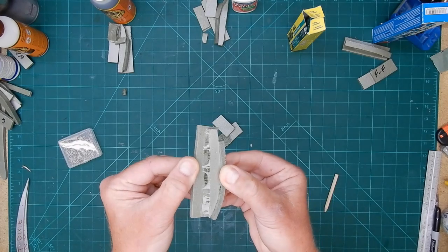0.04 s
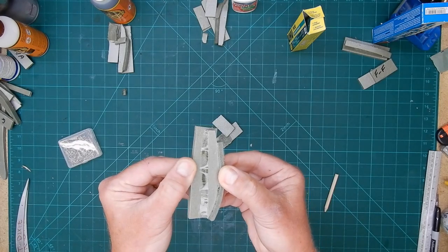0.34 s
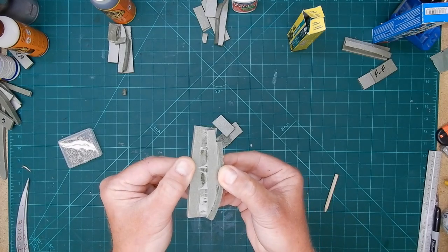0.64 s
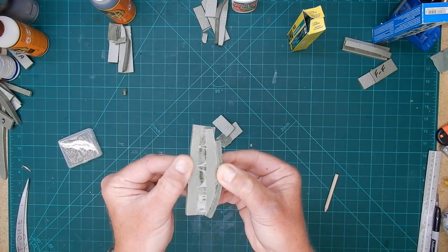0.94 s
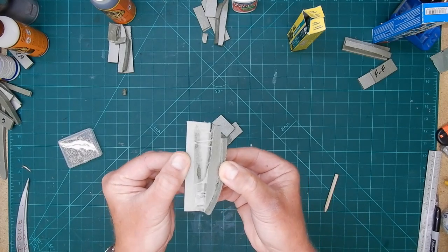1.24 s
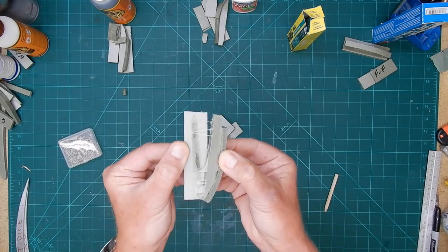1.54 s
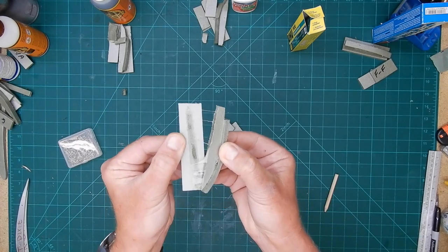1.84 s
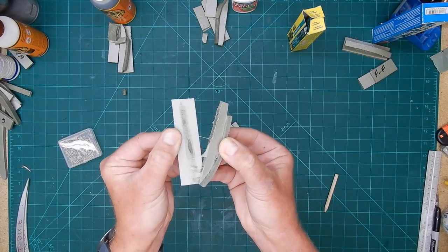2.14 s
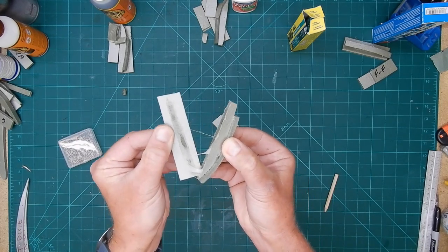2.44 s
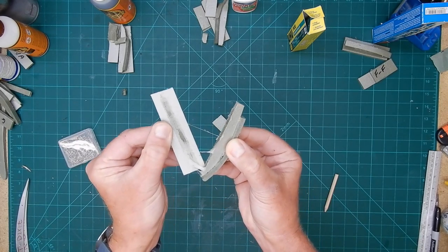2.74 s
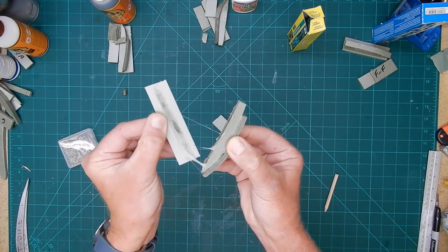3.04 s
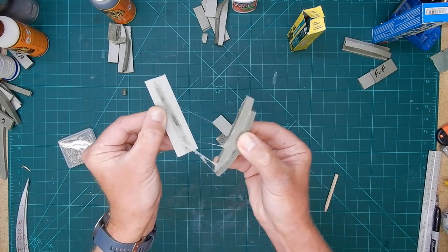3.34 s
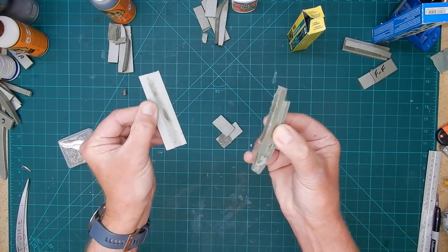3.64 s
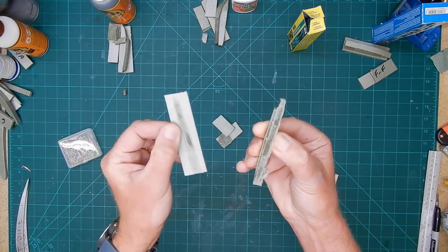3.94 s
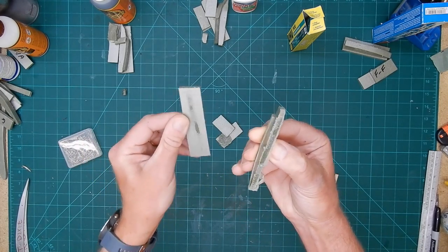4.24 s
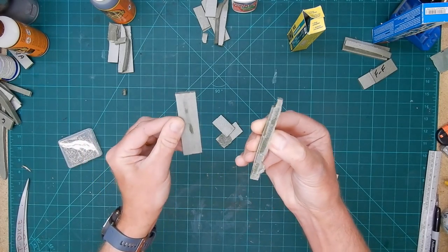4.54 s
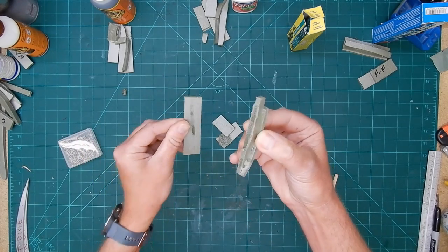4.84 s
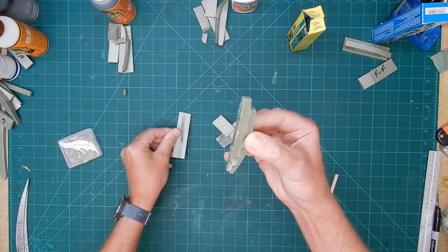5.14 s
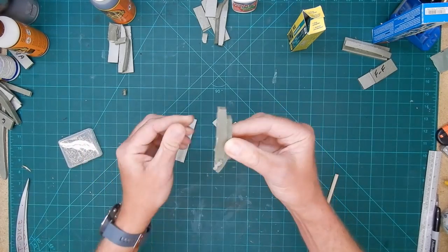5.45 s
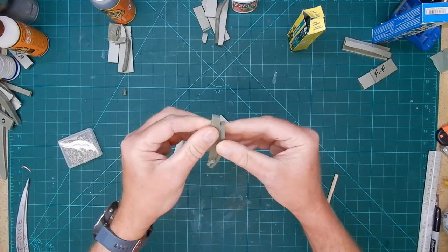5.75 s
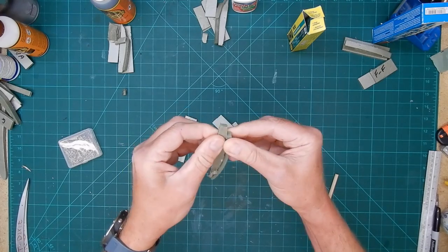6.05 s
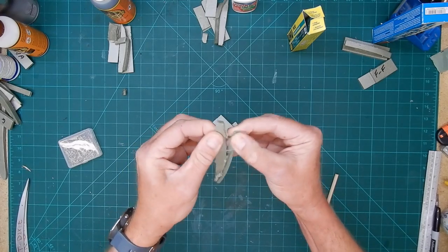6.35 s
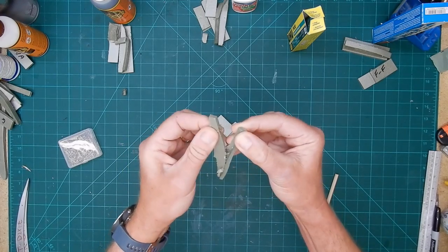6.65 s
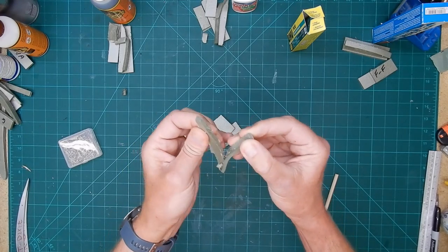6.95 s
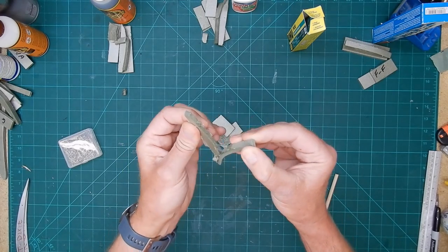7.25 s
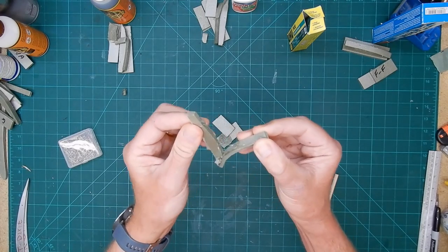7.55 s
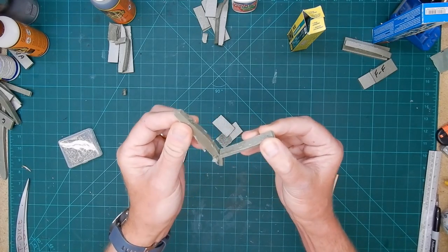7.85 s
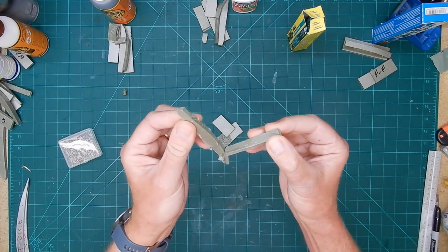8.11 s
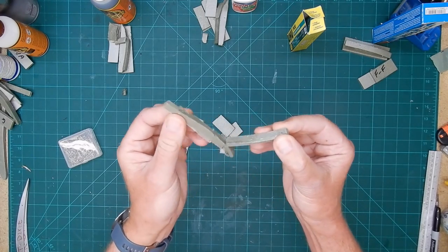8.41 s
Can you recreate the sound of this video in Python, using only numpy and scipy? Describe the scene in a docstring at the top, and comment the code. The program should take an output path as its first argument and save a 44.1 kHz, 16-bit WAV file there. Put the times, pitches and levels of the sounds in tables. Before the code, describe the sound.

Two glued foam strips are slowly pulled apart by hand, giving a fine, faint crackle dotted with sharper snaps. They come free with a couple of small hollow pops. Fingers rub softly on the foam and one strip taps down on a cutting mat, then the other is split with more crackling and snapping. The microphone is close overhead in a small, quiet workroom with low background noise.

```python
"""Two glued foam strips are pulled apart by hand above a cutting mat in a small, quiet workroom.
With each pull, glue threads and foam cells part in a fine crackle with sharper snaps; one strip is
laid down, the fingers shift their grip on the other and split it again. The mat throws a bright echo
up to the overhead microphone, and a soft room noise swells and dips behind it all."""
import sys
import numpy as np
from scipy import signal
from scipy.fft import rfft, irfft, next_fast_len
from scipy.io import wavfile
from scipy.ndimage import uniform_filter1d, map_coordinates

SR = 44100
rng = np.random.default_rng(int(sys.argv[2]) if len(sys.argv) > 2 else 0)


def put_to_file(sound):
    """Save the sound as 16-bit audio at rate SR, in the file named by the first command-line argument."""
    columns = np.atleast_2d(sound).T  # one column per channel
    safe = np.clip(columns, -1, 1)
    whole_steps = np.round(safe * 32767)
    wavfile.write(sys.argv[1], SR, whole_steps.astype(np.int16))


N = 382788

# The dull bed of room noise. Each row: frequency in Hz, level in dB.
ROOM_TONE_EQ = [(20, -2.5), (35, -26), (60, -3), (85, -14), (125, -4.5), (190, -1), (280, -4), (450, -4),
                (600, -10), (1100, -8.5), (1600, -15), (2600, -23.5), (4500, -31), (9000, -39.5),
                (15000, -39)]
# A faint electronic whine. Each row: pitch in Hz, level in dB relative to the room noise.
WHINE_TONES = [(11808, -29), (12407, -28), (12467, -32)]
# The bed ducks after sharp cracks. Each row: time of the low point in seconds, depth in dB.
ROOM_TONE_DIPS = [(.2, 16), (.9, 10.5), (1.19, 13.5), (1.57, 19), (1.8, 15), (2.63, 10.5), (3.16, 9),
                  (3.53, 8), (5.28, 5.5), (6.51, 13.5), (7.06, 8.5), (7.85, 18), (8.62, 10.5)]
# The room's tail. Each row: frequency in Hz, time to fade by 60 dB in seconds.
TAIL_T60 = [(150, 0.39), (1000, 0.02), (4000, 0.1767), (14000, 0.17)]
# The tail's colour. Each row: frequency in Hz, level in dB.
TAIL_EQ = [(150, -9.5), (1000, 10), (4000, -4.5), (14000, -2)]
# The dull straight path and the bright bounce off the mat. Each row: frequency in Hz, gain in dB.
DIRECT_EQ = [(200, -2.5), (3000, -0.5), (6000, -3), (9000, -8), (15000, -28.5)]
MAT_EQ = [(200, -6), (1500, -4.5), (4000, -5), (8000, 0), (15000, -1)]
# Knock of a flexing strip, crack of foam, fizz of parting glue. Each row: frequency in Hz, level in dB.
KNOCK_EQ = [(60, -37), (160, -11), (330, -4), (600, -4.5), (900, 1.5), (1300, -13), (2500, -35)]
CRACK_EQ = [(400, -34), (950, -12), (1300, 2.5), (2200, 3), (3700, 3.5), (5200, -0.5), (6800, -5),
            (10000, -44)]
FIZZ_EQ = [(2500, -35.5), (4800, -2.5), (6500, -2.5), (8500, 0.5), (11000, 0.5), (14000, 0.5), (16000, -2)]
# Resonances of a glue-stiffened strip and a loose one. Each row: centre in Hz, width in octaves,
# boost or cut in dB.
STUCK_RESONANCES = [(1310, 0.057, -4), (2290, 0.12, 16), (3600, 0.096, 21), (4990, 0.24, -18.5)]
LOOSE_RESONANCES = [(1350, 0.12, 8.4), (2010, 0.2, 4.4), (4440, .12, 10)]
# How much of the strip is still glued. Each row: time in seconds, share from 0 to 1.
STUCK_SHARE = [(0, 0.46), (1.05, 0.37), (1.25, 0.8), (1.8, 0.55), (2.3, 0.04), (6.5, 0.8), (7, 0.52),
               (8.6, 0.34)]
# Fingers sliding to a new grip. Each row: start in seconds, length in seconds, level in dB.
FINGER_RUBS = [(2.98, 0.0057, -67), (3.9, .04, -60), (4.09, 0.0089, -74), (4.235, 0.0058, -67),
               (4.375, 0.038, -65.5), (4.55, 0.015, -74), (4.925, 0.018, -62), (5.33, 0.039, -65),
               (5.575, 0.0068, -73), (5.755, 0.056, -66.5), (5.876, 0.0035, -48.5), (6.0, .15, -70.5),
               (6.171, 0.003, -46.5), (6.33, 0.11, -66), (6.487, .015, -45.5)]
# A whole strip jerks and pushes the air. Each row: start in seconds, level in dB.
STRIP_JERKS = [(0.1841, -46.5), (1.1433, -54), (1.5654, -51), (5.247, -48.5), (5.256, -51.5), (7.7461, -61),
               (8.6087, -64)]
# Hollow pops and pings. Each row: start in seconds, pitch in Hz, level in dB, 60 dB fade in seconds.
STRIP_POPS = [(2.15, 1337, -43.5, 0.047), (2.152, 338, -52.5, 0.091), (2.149, 566, -50.5, 0.063),
              (3.4731, 360, -43.5, 0.061), (3.4739, 474, -38, 0.057), (3.58, 817, -40, 0.037),
              (3.579, 4510, -39, 0.034), (5.2524, 178, -42.5, 0.064)]
# Pulls that keep the seam tearing. Each row: start and length in seconds, crack and fizz levels in dB.
SEAM_PULLS = [(0, 0.33, -70.5, -66.5), (0.248, .5, -73, -70.5), (0.787, 0.37, -66.5, -64.5),
              (1.16, 0.03, -46.5, -47.5), (1.217, 0.024, -51.5, -54.5), (1.286, .17, -60.5, -63),
              (1.485, .07, -53.5, -56.5), (1.598, .15, -63.5, -66.5), (1.759, .03, -56, -59),
              (1.833, .28, -80.5, -81), (2.164, 0.052, -62, -64), (2.409, 0.059, -53, -55),
              (2.478, .15, -50.5, -53.5), (2.688, .045, -52, -52.5), (3.113, .16, -67, -65.5),
              (3.332, .13, -75.5, -71), (3.464, .025, -48, -55), (6.486, .07, -64, -59.5),
              (6.601, 0.13, -89, -76.5), (6.811, 0.25, -73, -67.5), (7.097, .025, -55.5, -52.5),
              (7.16, 0.083, -73.5, -73), (7.297, .16, -71.5, -67), (7.493, 0.087, -77, -70.5),
              (7.711, 0.15, -64.5, -60.5), (8.499, .14, -69, -65)]
# The featured snaps of glue and foam, and taps of the strips. Each row: start in seconds,
# knock, crack and fizz levels in dB, ring pitch in Hz.
CLEAR_SNAPS = [(0.037, -75, -73.5, -56, 7870), (0.1266, -66.5, -61, -55, 1200),
               (0.1597, -71, -54, -49, 5200), (0.1852, -48.5, -39.5, -37, 3360),
               (0.2058, -61, -41, -37.5, 3680), (0.2473, -86, -62, -46.5, 7510),
               (0.2757, -79, -50.5, -43.5, 2670), (0.463, -74, -50.5, -43, 5140),
               (0.489, -86, -57, -51, 4690), (0.5237, -82, -58, -46, 7620), (0.537, -64, -49, -42.5, 2850),
               (0.6177, -92, -59, -55, 7900), (0.705, -76, -58, -82, 3300),
               (0.795, -82, -53.5, -45.5, 7900), (0.8555, -61, -46.5, -55, 3420),
               (0.8968, -55.5, -44.5, -36.5, 7550), (0.9685, -79, -58.5, -82, 4870),
               (0.9992, -64, -54.5, -70, 3580), (1.074, -82, -58.5, -53.5, 4960),
               (1.114, -60, -49, -47, 3470), (1.143, -50.5, -39.5, -42, 6140),
               (1.1818, -66, -48.5, -44.5, 3350), (1.191, -73, -57, -45, 3380),
               (1.2879, -70, -54, -54, 7940), (1.364, -80, -50, -51, 3300), (1.378, -68, -53, -53, 2350),
               (1.4146, -67, -47.5, -48.5, 3440), (1.4734, -69, -45.5, -47, 3580),
               (1.498, -73, -56, -48.5, 3570), (1.513, -75, -63, -54, 3560),
               (1.5413, -63, -50, -46.5, 3550), (1.5657, -54.5, -31, -36, 3870),
               (1.841, -80, -62, -63, 2290), (1.938, -74, -60, -62, 2310), (1.977, -81, -62, -62.5, 2200),
               (2.102, -80, -62, -67, 3500), (2.15, -48, -39.5, -44, 1370), (2.164, -56, -45.5, -44, 3340),
               (2.3313, -80, -54.5, -60, 3380), (2.3684, -80, -52, -59.5, 3600),
               (2.396, -63, -53, -54, 3600), (2.4071, -61, -44.5, -44, 2400),
               (2.4525, -61.5, -39, -40, 2100), (2.5132, -61, -45, -44, 1400),
               (2.5258, -56, -47.5, -51, 1270), (2.5445, -62, -45, -44, 2450),
               (2.5655, -64, -53, -45.5, 2340), (2.5927, -68, -40.5, -51, 2300),
               (2.5998, -60, -45.5, -40.5, 2250), (2.6137, -61, -41.5, -43, 2190),
               (2.651, -78, -45, -47, 4530), (2.688, -75, -46, -47, 4130), (2.709, -76, -44, -45, 4370),
               (2.7706, -78, -50.5, -54, 7240), (2.834, -79.5, -50.5, -53.5, 1800),
               (3.1482, -55.5, -35.5, -39.5, 2120), (3.1988, -80, -52, -51.5, 1467),
               (3.2244, -78, -51, -52, 1470), (3.3687, -77, -53, -54.5, 2110),
               (3.4732, -42.5, -32.5, -39, 2010), (3.4853, -53, -38.5, -46.5, 2030),
               (3.528, -54, -37.5, -37, 4600), (3.579, -45.5, -36.5, -40, 4500),
               (3.773, -59, -56, -66.5, 2140), (4.372, -67, -54, -59, 1200),
               (4.9719, -80, -55.5, -51.5, 1320), (5.254, -44.5, -36.5, -46, 2470),
               (5.2655, -47, -27, -40, 4000), (5.8764, -56, -49.5, -51, 5000),
               (6.4858, -55, -60, -39, 7660), (6.4949, -61, -59, -38.5, 7100),
               (6.78, -79, -65, -57.5, 6740), (6.956, -89, -55, -59, 3530), (7.0, -81, -57, -48.5, 7800),
               (7.0198, -71, -51, -51, 3580), (7.048, -58.5, -38.5, -42, 3430),
               (7.086, -75, -50, -47.5, 3300), (7.1007, -69, -47.5, -47.5, 2570),
               (7.331, -74, -63, -53.5, 7840), (7.3572, -77, -61, -60, 3310),
               (7.4071, -72, -62, -48.5, 7840), (7.4512, -74, -58, -69, 3350),
               (7.7447, -57, -41, -40, 4940), (7.8082, -59, -41.5, -41, 5970),
               (7.831, -52.5, -40, -40, 3150), (7.909, -77, -59, -60.5, 3260),
               (8.4347, -73, -65, -57, 3310), (8.5012, -76, -59, -55.5, 4900),
               (8.5248, -66, -54, -52, 3400), (8.562, -61, -49.5, -49, 4630),
               (8.6087, -50.5, -39, -39.5, 5200)]

MAT_DELAY_S = .003765


def amp(db):
    """Decibels to gain."""
    return 10 ** (np.asarray(db) / 20)


def unit(x):
    """Scaled to rms 1."""
    return x / np.sqrt(np.mean(x ** 2) + 1e-20)


def along(points, hz):
    """(Hz, value) points read on a log frequency axis."""
    freqs, values = np.transpose(points)
    return np.interp(np.log(hz + 1), np.log(freqs), values)


def filtered(x, response):
    """x through a complex frequency response."""
    size = next_fast_len(N + SR // 2)
    return irfft(rfft(x, size) * response(np.fft.rfftfreq(size, 1 / SR)), size)[:N]


def coloured(x, eq, resonances=(), size=1024):
    """x rung through a minimum-phase impulse of energy 1 with the given EQ and resonances."""
    hz, n = np.fft.rfftfreq(size, 1 / SR), np.arange(size)
    peaks_db = sum(db / (1 + (np.log2((hz + 1) / centre) / width) ** 2)
                   for centre, width, db in resonances)
    cepstrum = irfft(np.log(amp(along(eq, hz) + peaks_db)))
    impulse = irfft(np.exp(rfft(2 * cepstrum * (n < size // 2) * (n > 0))))
    return signal.fftconvolve(x, impulse / np.linalg.norm(impulse))[:len(x)]


def add(track, start, sound):
    """Mix a sound into the track at a start time in seconds."""
    part = track[max(0, round(start * SR)):][:len(sound)]
    part += sound[:len(part)]


def swells(rows, rise_db_per_s, fall_db_per_s, rest_db=-105):
    """Envelope in dB: each (start, length, dB) row fades in, holds and fades out; the highest wins."""
    t = np.arange(0, N, 32) / SR
    start, length, db = np.transpose(rows)[:, :, None]
    before, after = np.maximum(start - t, 0), np.maximum(t - start - length, 0)
    level = db - rise_db_per_s * before - fall_db_per_s * after
    return np.interp(np.arange(N) / SR, t, np.maximum(level.max(axis=0), rest_db))


def room_tone(level_db=-58):
    """Dull room noise, coloured by the mat, with a thin whine; both duck quickly and creep back."""
    dips = [(s, 0, depth) for s, depth in ROOM_TONE_DIPS]
    duck_db = swells(dips, rise_db_per_s=315, fall_db_per_s=15, rest_db=0)
    air = filtered(rng.standard_normal(N), lambda hz: amp(along(ROOM_TONE_EQ, hz)))
    t = np.arange(N) / SR
    whine = sum(amp(db) * np.sqrt(2) * np.sin(2 * np.pi * hz * t) for hz, db in WHINE_TONES)
    return amp(level_db - duck_db) * (unit(over_mat(air)) + whine)


def room_reverb(x, tail_db=-9, clutter_db=-7, clutter_t60=0.0456, spans=28):
    """Bench clutter scatters the sound and the walls add a short tail; both change as the hands move."""
    out, t = np.zeros(N), np.arange(SR // 4) / SR
    for span in np.array_split(np.arange(N), spans):
        hz, age, noise = signal.stft(rng.standard_normal(len(t)), SR, nperseg=256)
        decay = amp(along(TAIL_EQ, hz)[:, None] - 60 * age / along(TAIL_T60, hz)[:, None])
        tail = signal.istft(noise * decay, SR)[1][:len(t)]
        clutter = rng.standard_normal(len(t)) * amp(-60 * t / clutter_t60)
        impulse = (amp(tail_db) * unit(tail) + amp(clutter_db) * unit(clutter)) / np.sqrt(len(t))
        add(out, span[0] / SR + MAT_DELAY_S, signal.fftconvolve(x[span], impulse))
    return out


def over_mat(x):
    """Treble misses the microphone on the straight path and reaches it in the echo off the mat."""
    def response(hz):
        echo = amp(along(MAT_EQ, hz)) * np.exp(-2j * np.pi * hz * MAT_DELAY_S)
        return amp(along(DIRECT_EQ, hz)) + echo
    return filtered(x, response)


def finger_rubs(grain_db=4, catches_per_s=90, catch_db=3.0, foam_db=-8, gain_db=1):
    """Skin slides over the foam with a soft, grainy hiss, catching and slipping as it goes."""
    grip = rng.standard_normal(int(N * catches_per_s / SR) + 4)
    catch = map_coordinates(grip, [np.arange(N) * catches_per_s / SR])
    drive = amp(swells(FINGER_RUBS, rise_db_per_s=900, fall_db_per_s=600) + catch_db * catch + gain_db)
    slips = lambda: drive * unit(rng.standard_normal(N) * amp(grain_db * rng.standard_normal(N)))
    return coloured(slips(), FIZZ_EQ) + amp(foam_db) * coloured(slips(), CRACK_EQ)


def air_thumps(push_s=0.00093, gain_db=-6, size=1400):
    """One low push of air as a strip comes free or lands."""
    out, age = np.zeros(N), np.arange(size) / SR / push_s
    push = unit(age * (2 - age) * np.exp(-age))
    for start, db in STRIP_JERKS:
        add(out, start, amp(db + gain_db) * push)
    return out


def hollow_pops(gain_db=3, size=4096):
    """A strip that springs free or lands rings on for a moment."""
    out, t = np.zeros(N), np.arange(size) / SR
    for start, hz, db, t60 in STRIP_POPS:
        add(out, start, amp(db + gain_db - 60 * t / t60) * np.sin(2 * np.pi * hz * t))
    return out


def bending_chirp(x, spread=.33, on_time_hz=2500):
    """Bending waves carry treble along the strip faster than bass: each click chirps downward."""
    return filtered(x, lambda hz: np.exp(-1j * spread * (np.sqrt(hz) - hz / (2 * np.sqrt(on_time_hz)))))


def tearing_envelopes(crack_offset_db=-16.5, fizz_offset_db=-15.5):
    """Crack and fizz envelopes in dB: the seam tears during each pull and briefly around each snap."""
    def envelope(pulls, flurries):
        return np.maximum(swells(pulls, rise_db_per_s=706, fall_db_per_s=501),
                          swells(flurries, rise_db_per_s=847.5, fall_db_per_s=539))
    crack = envelope([(s, length, db) for s, length, db, _ in SEAM_PULLS],
                     [(s, 0, db + crack_offset_db) for s, _, db, _, _ in CLEAR_SNAPS])
    fizz = envelope([(s, length, db) for s, length, _, db in SEAM_PULLS],
                    [(s, 0, db + fizz_offset_db) for s, _, _, db, _ in CLEAR_SNAPS])
    return crack, fizz


def peeling(base_per_s=220, density_slope=0.88, scatter_db=7.5, rub=0.32, relief_s=0.024,
            crack_db=1.0, fizz_db=4.5, flex_db=-17):
    """Cells and glue threads part at random, in very unequal sizes, over the rub of skin on foam."""
    crack, fizz = tearing_envelopes()
    stuck = np.interp(np.arange(N) / SR, *np.transpose(STUCK_SHARE))
    rate = base_per_s * amp(density_slope * (fizz - fizz.mean()))  # a harder pull breaks more cells
    hits = rng.random(N) < rate / SR
    breaks = hits * amp(scatter_db * rng.standard_normal(N)) * rng.choice([-1, 1], N)
    grains = unit(breaks / np.sqrt(rate)) + rub * rng.standard_normal(N)
    # a big break relieves the strain, so its neighbours are weaker
    grains /= np.sqrt(np.abs(uniform_filter1d(grains ** 2, int(relief_s * SR))) + 1e-9)
    drive = grains * amp(crack + crack_db)
    stiff = coloured(drive * stuck, CRACK_EQ, STUCK_RESONANCES)
    loose = coloured(drive * (1 - stuck), CRACK_EQ, LOOSE_RESONANCES)
    flex = coloured(drive * amp(flex_db), KNOCK_EQ)
    glue = coloured(grains * rng.choice([-1, 1], N) * amp(fizz + fizz_db), FIZZ_EQ)
    return stiff + loose + flex + glue


def thread_snap_rows(base_per_s=13, density_slope=.35, light_pull_db=-70, lift_db=3.0, scatter_db=5.5,
                     knock_db=-20, ring_hz=2900, spread_octaves=0.5, count=24):
    """Cues for small snaps: single glue threads let go at random, more of them in a harder pull."""
    rows = []
    for start, length, crack, fizz in SEAM_PULLS:
        expected = base_per_s * length * amp(density_slope * (crack - light_pull_db))
        slots = (np.arange(count) + rng.random(count)) / count
        chances, jitters = rng.random(count), rng.standard_normal((count, 3))
        for slot, chance, (crack_jitter, fizz_jitter, detune) in zip(slots, chances, jitters):
            if chance < expected / count:
                crack_level = crack + lift_db + scatter_db * crack_jitter
                fizz_level = fizz + lift_db + scatter_db * fizz_jitter
                hz = ring_hz * 2 ** (spread_octaves * detune)
                rows.append((start + slot * length, crack_level + knock_db, crack_level, fizz_level, hz))
    return rows


def snaps(crack_t60=0.004, fizz_t60=0.005, growth=0.13, knock_t60=0.013, ring_t60=0.0074, ring_db=-11,
          flap_octaves=0.24, flap_db=7, haze_db=-17, haze_t60=0.038,
          knock_db=-8.0, crack_db=-10.5, fizz_db=-6, size=2000):
    """Each snap is a tiny avalanche of breaking cells that flexes the strip and rings it briefly."""
    out, t = np.zeros(N), (np.arange(size) - size // 4) / SR
    fade = lambda t60: (t >= 0) * amp(-60 * np.abs(t) / t60)
    for start, knock, crack, fizz, hz in CLEAR_SNAPS + thread_snap_rows():
        grit = rng.standard_normal((5, size))
        stretch = amp(growth * (fizz + 51.0))  # bigger avalanches last longer
        # a faint gritty haze swells just before each snap and fades after it
        haze = grit[3] * grit[4] * amp(haze_db - 60 * np.abs(t) / haze_t60)
        flap = [(hz, flap_octaves, flap_db)]  # the freed flap sets the pitch
        burst = unit(coloured(grit[0] * fade(crack_t60 * stretch) + haze, CRACK_EQ, flap))
        ring = unit(np.sin(2 * np.pi * hz * t) * fade(ring_t60))
        foam = amp(crack + crack_db) * unit(burst + amp(ring_db) * ring)
        glue = amp(fizz + fizz_db) * unit(coloured(grit[1] * fade(fizz_t60 * stretch) + haze, FIZZ_EQ))
        flex = amp(knock + knock_db) * unit(coloured(grit[2] * fade(knock_t60), KNOCK_EQ))
        add(out, start + t[0], foam + glue + flex)
    return out


def scene():
    """The strips up close above the mat, with a short reverb and a bed of room tone, in mono."""
    strips = bending_chirp(snaps() + peeling() + finger_rubs()) + hollow_pops() + air_thumps()
    return (over_mat(strips) + room_reverb(strips) + room_tone())[None]


def record(dry, threshold_db=-106, floor_db=-14, top_hz=15450):
    """The recorder turns each band down while it is very faint and cuts off the top end steeply."""
    bands = signal.stft(dry[0], nperseg=512)[2]
    power = uniform_filter1d(np.abs(bands) ** 2, size=9, axis=0)  # smoothed over frequency
    power = np.abs(uniform_filter1d(power, size=3, axis=1))  # and over time
    gain = np.maximum(power / (power + amp(threshold_db) ** 2), amp(floor_db))
    hushed = signal.istft(bands * gain)[1][:N]
    return filtered(hushed, lambda hz: 1 / np.sqrt(1 + (hz / top_hz) ** 200))[None]


dry = scene()
out = record(dry)
put_to_file(out)
```